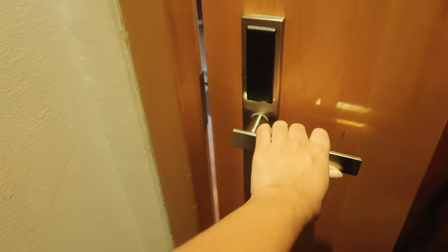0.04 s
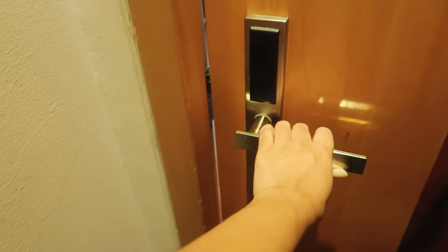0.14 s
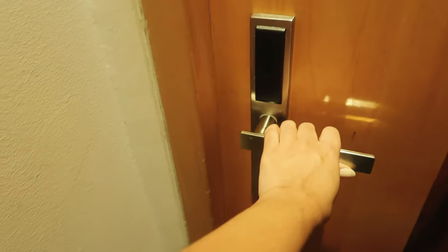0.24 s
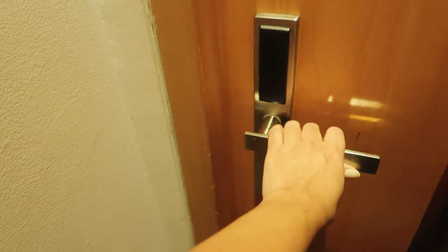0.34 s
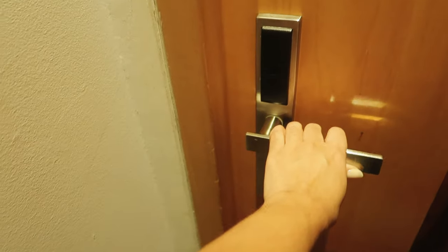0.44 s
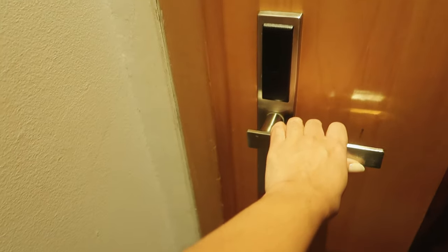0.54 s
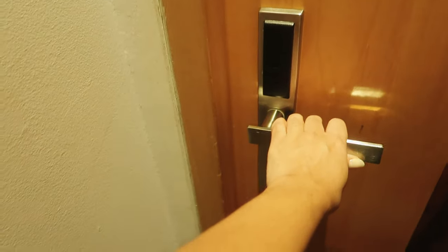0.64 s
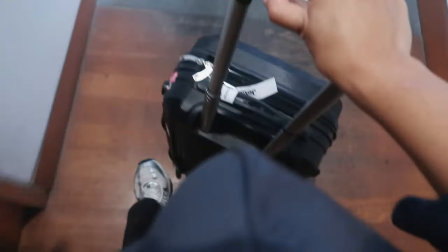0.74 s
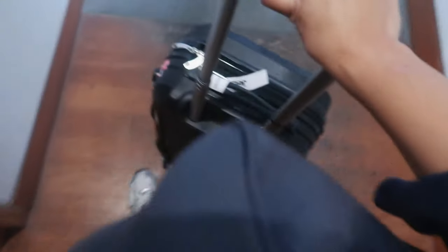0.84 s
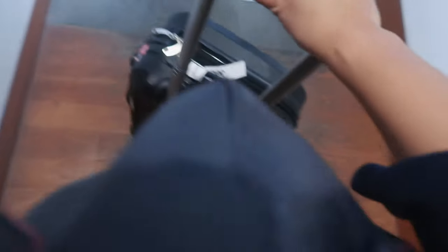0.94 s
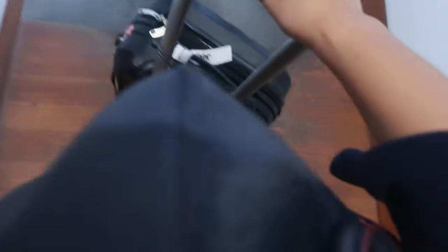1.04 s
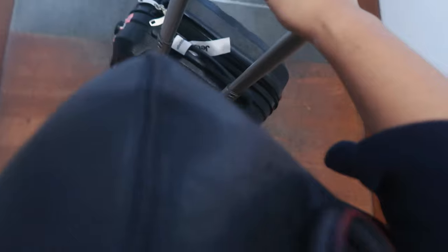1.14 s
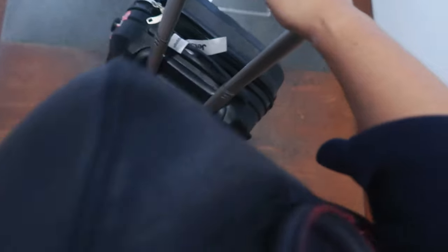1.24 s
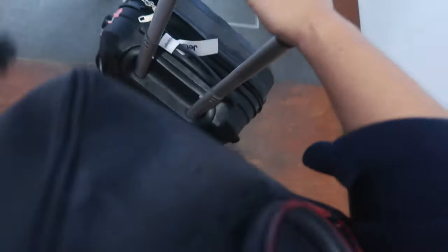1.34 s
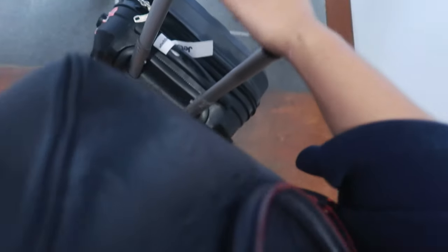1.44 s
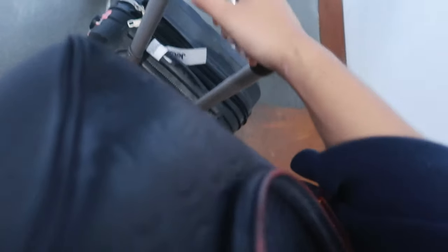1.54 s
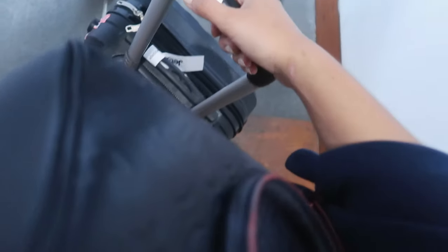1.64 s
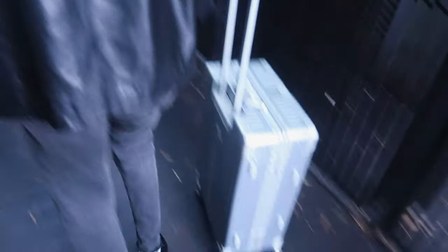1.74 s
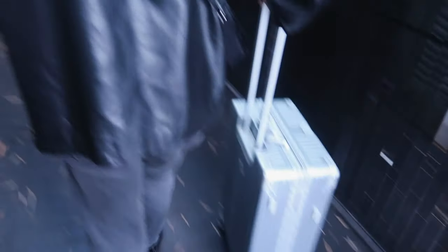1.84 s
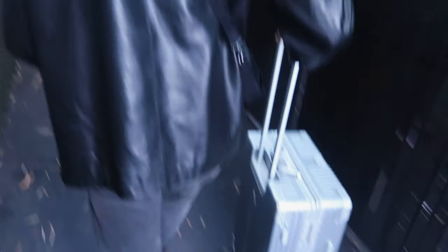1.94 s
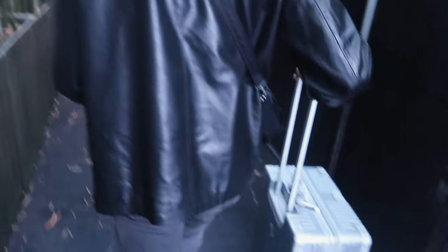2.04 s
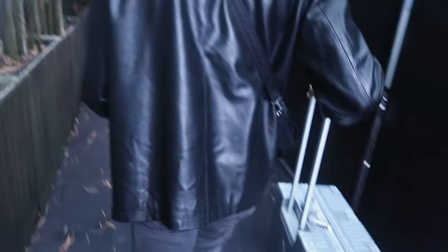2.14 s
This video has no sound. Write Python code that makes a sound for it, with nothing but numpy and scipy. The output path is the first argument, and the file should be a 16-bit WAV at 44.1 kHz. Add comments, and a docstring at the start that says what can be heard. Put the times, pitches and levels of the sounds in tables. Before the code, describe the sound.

A suitcase lands with a loud, short thump and plastic click, then rolls very faintly; before it a wooden door rattles and knocks shut in a corridor, after it another case bumps past. Close handheld microphone.

```python
"""Door latch and two rolling suitcases

Three scenes in a row. A wooden door is pulled shut in a corridor: latch ticks, knocks ringing the modes of the leaf,
rubbing noise, a deep shudder. A suitcase drops over a sill with a thump, then clicks and rolls on, the level
dropping after the thump; then another case rumbles by and bumps. Blows are struck modes, ticks are short noise
bursts, rolling is shaped uneven noise. The microphones limit the band; the loudest blows clip almost hard at full scale.
"""
import sys
import numpy as np
from scipy import signal
from scipy.fft import rfft, irfft, next_fast_len
from scipy.io import wavfile
from scipy.ndimage import uniform_filter1d, map_coordinates

SR = 44100
rng = np.random.default_rng(int(sys.argv[2]) if len(sys.argv) > 2 else 0)


def inscribe(sig):
    """Save sig as 16-bit PCM at rate SR to the path in sys.argv[1].

    A 1-D sig is mono; a 2-D sig holds one channel per row.
    Samples are clipped to [-1, 1] before scaling.
    """
    pcm = np.round(np.clip(np.atleast_2d(sig).T, -1, 1) * 32767)
    wavfile.write(sys.argv[1], SR, pcm.astype(np.int16))


def convert_level_to_amplitude(level_db):
    """Map a level in decibels to its linear amplitude factor."""
    exponent = np.asarray(level_db, float) / 20
    return 10 ** exponent


N = 97020

RISE_S = 0.0011  # build-up time constant of a blow

# deep bass of door and wheels: hz, relative_db
BASS = [(15, -38), (35, -2.5), (60, -9), (120, -4), (200, -30.5), (400, -78)]
# modes of the first suitcase shell: hz, relative_db, t60_s
CASE1_MODES = [(70, -9, .014), (115, -3, .024), (156, -1, .026), (255, -1.5, .022), (345, -2.5, .02),
               (470, -4, .022), (790, -12, .015), (1500, -16, .01)]


def unit_rms(x):
    """Scales to rms 1."""
    return x / np.sqrt(np.mean(x ** 2) + 1e-20)


def along(points, hz):
    """Interpolates (hz, value) points on a log frequency axis."""
    point_hz, value = np.transpose(points)
    return np.interp(np.log(hz + 1), np.log(point_hz + 1), value)


def curves(rows):
    """One per-sample curve for each column after the time in seconds."""
    s, *columns = np.transpose(rows)
    return [np.interp(np.arange(N) / SR, s, column) for column in columns]


def filtered(x, response):
    """Multiplies the spectrum of x by response(hz)."""
    n = x.shape[-1]
    size = next_fast_len(n + 8192)
    spectrum = rfft(x, size) * response(np.fft.rfftfreq(size, 1 / SR))
    return irfft(spectrum, size)[..., :n]


def high_pass(hz, low_hz):
    """Second-order response: little is radiated or picked up below low_hz."""
    return (1j * hz / (low_hz + 1j * hz)) ** 2


def add(track, start_s, sound):
    """Adds sound into track in place, cut at the end."""
    room = track[..., round(start_s * SR):][..., :sound.shape[-1]]
    room += sound[..., :room.shape[-1]]


def lumps(per_s, depth_db):
    """Gain of a rubbed or rolled surface: smooth random unevenness, per_s points a second."""
    points = rng.standard_normal(N // 50)
    return convert_level_to_amplitude(depth_db * map_coordinates(points, [np.arange(N) * per_s / SR]))


def rush(spectrum, grain=1):
    """Two shaped noises of joint rms 1, patchy in time and frequency."""
    patchy_db = 2
    z = signal.stft(rng.standard_normal((2, N)) * grain, nperseg=512)[2]
    field = uniform_filter1d(rng.standard_normal(z.shape[1:]), 4, 0)
    field = unit_rms(uniform_filter1d(field, 6, 1))
    pair = signal.istft(z * convert_level_to_amplitude(patchy_db * field), nperseg=512)[1][:, :N]
    return unit_rms(filtered(pair, lambda hz: convert_level_to_amplitude(along(spectrum, hz))))


def ring(modes, weight_db, count):
    """One blow on count scattered copies of each mode, peak 1, and a random-sign twin for the side."""
    vary_db, pitch_scatter = 2.5, 0.06
    t = np.arange(SR // 4) / SR
    hz, db, t60_s = np.repeat(modes, count, axis=0).T[:, :, None]
    draw = rng.standard_normal((len(hz), 3))
    decay = convert_level_to_amplitude(db + weight_db(hz) + vary_db * draw[:, :1] - 60 * t / t60_s)
    wave = decay * np.sin(2 * np.pi * hz * (1 + pitch_scatter * draw[:, 1:2]) * t)
    wave = wave * (1 - np.exp(-t / RISE_S))
    pair = np.array([wave.sum(0), (wave * np.sign(draw[:, 2:])).sum(0)])
    return pair / np.abs(pair[0]).max()


def ticks(rows, octaves):
    """Short dying noise bursts, band-passed around a pitch."""
    x, t = np.zeros((2, N)), np.arange(SR // 10) / SR
    for start_s, peak_db, pitch_hz, t60_s in rows:
        def band(hz):
            detune = (hz / pitch_hz - pitch_hz / (hz + 1)) / octaves
            return 1 / (1 + 1j * detune) ** 2 / (1 + 1j * hz / (2 * pitch_hz)) ** 4

        burst = filtered(rng.standard_normal((2, len(t))) * convert_level_to_amplitude(-60 * t / t60_s), band)
        add(x, start_s, convert_level_to_amplitude(peak_db) * burst / np.abs(burst[0]).max())
    return x


def bumps(rows, modes, low_hz):
    """Soft blows on a shell, each stirring mostly the modes near its pitch."""
    width_octaves = 0.67
    x = np.zeros((2, N))
    for start_s, peak_db, pitch_hz in rows:
        def near_db(hz):
            return -20 * np.log10(1 + (np.log2(hz / pitch_hz + 1e-6) / width_octaves) ** 2)

        def soften(hz):
            return high_pass(hz, low_hz) / (1 + 1j * hz / (3 * pitch_hz)) ** 2

        blow = filtered(ring(modes, near_db, count=2), soften)
        add(x, start_s, convert_level_to_amplitude(peak_db) * blow / np.abs(blow[0]).max())
    return x


def rolling(rows, rumble_spectrum, hiss_spectrum):
    """Wheels on an uneven floor: lumpy shell rumble, thin hiss with half the lumps' dB, deep bass."""
    rumble_db, hiss_db, bass_db = curves(rows)
    grain = lumps(per_s=120, depth_db=2.5)
    rumble = convert_level_to_amplitude(rumble_db) * rush(rumble_spectrum, grain)
    hiss = convert_level_to_amplitude(hiss_db) * rush(hiss_spectrum, np.sqrt(grain))
    bass = convert_level_to_amplitude(bass_db) * rush([(28, -40)] + list(BASS[2:]))
    return rumble + hiss + bass


def spread(pair, alike, lean, lead_s):
    """Mid and side noise become left and right with given likeness, level lean and left lead."""
    def mix(hz):
        turn = np.arccos(np.clip(along(alike, hz), -1, 1)) / 2
        return np.array([np.cos(turn), np.sin(turn)])

    mid, side = filtered(pair, mix)
    half = np.array([[.5], [-.5]])

    def offset(hz):
        return convert_level_to_amplitude(half * along(lean, hz)) * np.exp(2j * np.pi * half * hz * lead_s)

    return filtered(np.array([mid + side, mid - side]), offset)


def hush():
    """Steady quiet background noise behind the door."""
    # hz, relative_db
    hush_spectrum = [(15, -36), (25, -10), (212, -2), (450, -11), (1560, -21.5), (11000, -46), (16000, -71)]
    return convert_level_to_amplitude(-40) * rush(hush_spectrum)


def corridor(x):
    """Reverberation: a noise tail in which each frequency dies at its own speed."""
    # hz, t60_s
    decay_times = [(100, 0.23), (1000, 0.34), (5000, 0.24), (12000, 0.091)]
    hz, t, z = signal.stft(rng.standard_normal((2, SR // 2)), SR, nperseg=256)
    z = z * convert_level_to_amplitude(-60 * t / along(decay_times, hz)[:, None])
    tail = signal.istft(z, SR, nperseg=256)[1]
    delayed = np.pad(x, ((0, 0), (200, 0)))  # 200 samples
    return signal.fftconvolve(delayed, tail / np.linalg.norm(tail[0]), axes=1)[:, :N]


def second_case():
    """Another case rumbles by: rolling noise plus bumps ringing its shell."""
    # start_s, rumble_db, hiss_db, bass_db
    roll_levels = [(1.74, -29.5, -53, -46), (1.77, -27, -56.5, -53), (1.81, -20, -44.5, -62),
                   (1.85, -29, -54, -50), (1.91, -20.5, -50, -34), (1.932, -13.5, -32.5, -21.5),
                   (1.952, -19.5, -42, -49), (1.974, -33.5, -63, -47.5), (2.078, -36, -61.5, -54.5),
                   (2.13, -32, -62, -61), (2.186, -33, -61, -40.5), (2.2, -36, -54.5, -46.5)]
    # hz, relative_db
    rumble_spectrum = [(65, -46), (110, -14.5), (155, 3.5), (215, -6.5), (400, -4.5), (651, -19.5),
                       (1400, -32.5), (3080, -110)]
    # hz, relative_db
    hiss_spectrum = [(650, -33.5), (1100, -11.5), (5000, -13), (16000, -52.5)]
    # start_s, peak_db, most_excited_hz
    bump_rows = [(1.79, -25, 250), (1.803, -16.5, 393), (1.921, -21, 350), (1.929, -7.5, 104.6),
                 (1.9335, -4, 379), (1.937, -7, 216), (1.942, -13, 361), (1.948, -11.5, 252)]
    # shell modes: hz, relative_db, t60_s
    shell_modes = [(90, -3, .035), (150, -3.5, .04), (245, -1.5, .04), (345, -1, .04), (470, -4, .035),
                   (790, -16, .025), (1600, -24, .02), (2700, -26, .02)]
    # hz, left_right_likeness
    alike = [(60, 1), (240, 1), (950, 0.46), (3770, 1), (15000, 0.037)]
    # hz, left_minus_right_db
    lean = [(100, 0), (350, -0.5), (2380, 0)]
    x = rolling(roll_levels, rumble_spectrum, hiss_spectrum) + bumps(bump_rows, shell_modes, low_hz=40.3)
    return spread(x, alike, lean, lead_s=.0001)


def first_case():
    """A case rolls on, its level dropping after the thump: rolling noise, shell bumps, plastic clicks."""
    # start_s, rumble_db, hiss_db, bass_db
    roll_levels = [(.71, -37, -49, -37), (.76, -23, -31.5, -54), (.79, -52.5, -63, -47.5),
                   (.81, -43.5, -67.5, -60), (.854, -46, -68.5, -43.5), (.964, -47.5, -65.5, -58.5),
                   (1.05, -51, -65.5, -55), (1.18, -50, -66.5, -54.5), (1.2, -55, -70.5, -82),
                   (1.52, -56.5, -66, -64), (1.66, -57.5, -61.5, -80), (1.73, -55.5, -62, -76)]
    # hz, relative_db
    rumble_spectrum = [(76, -27), (130, -2.5), (393, -4.5), (529, -7), (570, -11), (733, -15.5),
                       (1200, -30.5), (1560, -38.5), (2640, -120)]
    # hz, relative_db
    hiss_spectrum = [(530, -42.5), (900, -10), (1160, -8.5), (1420, -11), (3590, -22.5), (16000, -49.5)]
    # start_s, peak_db, most_excited_hz
    bump_rows = [(.8628, -26, 383), (.8757, -17.5, 420), (1.387, -34, 446)]
    # plastic clicks: start_s, peak_db, pitch_hz, t60_s
    click_rows = [(.7575, -8, 1600, 0.0095), (.862, -25, 1200, 0.0097), (.8625, -32, 2270, .008),
                  (.8625, -45, 3960, 0.0095), (.8752, -30.5, 1400, 0.0093), (.8755, -37, 4000, 0.007),
                  (.887, -46.5, 1500, 0.043), (1.105, -52.5, 2200, .06), (1.3875, -42.5, 1410, 0.01)]
    # hz, left_right_likeness
    alike = [(60, 0.99), (240, 0.99), (950, 0.83), (3770, 0.081), (15000, 0.044)]
    # hz, left_minus_right_db
    lean = [(60, -0.091), (380, 0.74), (2380, -0.75)]
    x = rolling(roll_levels, rumble_spectrum, hiss_spectrum)
    x = x + bumps(bump_rows, CASE1_MODES, low_hz=40.3) + ticks(click_rows, octaves=.75)
    return spread(x, alike, lean, lead_s=.0001)


def sill_thump():
    """The first case lands off to the right: a cluster of blows on its shell."""
    # start_s, peak_db, most_excited_hz
    thump_rows = [(.7452, -1.5, 492), (.7485, -6, 473), (.7505, 0, 140), (.7535, 2, 400), (.7562, 9, 219),
                  (.7588, -1, 129)]
    # hz, left_right_likeness
    alike = [(180, 1), (400, .3), (2000, .1)]
    # hz, left_minus_right_db
    lean = [(180, 0.5), (380, -8.5), (3000, -9.5)]
    return spread(bumps(thump_rows, CASE1_MODES, low_hz=27.8), alike, lean, lead_s=.0001)


def door_shudder():
    """Deep shudder of the door: bass noise under a level curve."""
    # time_s, level_db
    sway_levels = [(0, -46.5), (.2, -53.5), (.3, -42), (.45, -40), (.52, -22.5), (.6, -34), (.68, -26),
                   (.71, -35.5)]
    (sway_db,) = curves(sway_levels)
    return convert_level_to_amplitude(sway_db) * rush(BASS)


def door_rub():
    """The leaf rubs in its frame: shaped noise, chattering as loose parts do while it moves."""
    # time_s, level_db
    rub_levels = [(.2, -33.5), (.26, -24.5), (.3, -27), (.39, -28.5), (.45, -27.5), (.58, -23),
                  (.66, -29.5), (.7, -30)]
    # hz, relative_db
    rub_spectrum = [(35, -34), (60, -12), (193, 8.5), (1280, -14.5), (1440, -8.5), (13000, -51.5),
                    (16000, -86.5)]
    (rub_db,) = curves([(.195, -91)] + list(rub_levels))
    return convert_level_to_amplitude(rub_db) * rush(rub_spectrum, lumps(per_s=290, depth_db=3))


def latch():
    """Latch and handle ticks, each with a ring of steel modes near its pitch, peaking 12 dB lower."""
    # start_s, peak_db, pitch_hz, t60_s
    tick_rows = [(.2025, -9.5, 5840, 0.017), (.2035, -12.5, 11700, 0.011), (.2045, -3.5, 4500, 0.0035),
                 (.251, -27.5, 5260, 0.16), (.298, -19.5, 6020, 0.084), (0.3083, -26.5, 10000, 0.018),
                 (.308, -22, 3200, .06), (.393, -27.5, 4080, 0.018), (.426, -30, 2400, 0.042),
                 (.4895, -25.5, 3670, 0.011), (.495, -19, 12400, 0.013), (0.4959, -5, 2600, 0.011),
                 (.5115, -17, 6616, 0.0057), (.519, -18, 10100, 0.034), (.549, -23.5, 4060, 0.043),
                 (.612, -21.5, 2800, 0.0061), (.684, -27, 5150, 0.0097)]
    # steel modes: hz, relative_db, t60_s
    steel_modes = [(2490, -3, .035), (3260, 0, .035), (4190, 0, .04), (5100, 1, .04), (6950, -2, .035),
                   (8300, -3, .03)]
    ring_db = -12  # relative to the tick
    x = ticks(tick_rows, octaves=0.74)
    for start_s, peak_db, pitch_hz, _ in tick_rows:
        steel = ring(steel_modes, lambda hz: -10 * np.abs(np.log2(hz / pitch_hz)), count=2)
        add(x, start_s, convert_level_to_amplitude(peak_db + ring_db) * steel)
    return x


def door_knocks():
    """Knocks of the leaf: crowded wood modes driven by a short rattling contact."""
    # start_s, peak_db, brightness_db_per_octave
    knock_rows = [(0.2031, -5.5, 5), (.208, -6.5, 3.5), (.252, -17.5, 6), (0.3072, -11, 5), (.313, -7.5, 0),
                  (0.4235, -12.5, -0.5), (0.44, -12.5, 0), (0.4953, 2.5, 2), (.499, -5.5, -0.5),
                  (0.518, -15.5, 2), (0.528, -17, -2), (.552, -19, -1.5), (.6115, -8.5, 0),
                  (0.6161, -8, -0.5)]
    # modes of the leaf: hz, relative_db, t60_s
    leaf_modes = [(118, -6, .15), (167, -4, .17), (300, -5, .11), (358, -1.5, .1), (441, -7, .1),
                  (500, -6, .09), (640, -6, .08), (760, -5, .07), (1000, -3, .055), (1200, -9, .045),
                  (1595, -9, .04), (2100, -12, .035), (2600, -13, .03), (3230, -18, .02)]
    chatter_t60_s, leaf_low_hz = .011, 94
    x, t = np.zeros((2, N)), np.arange(SR // 50) / SR
    contact = convert_level_to_amplitude(-60 * t / chatter_t60_s) * (1 - np.exp(-t / RISE_S))
    for start_s, peak_db, tilt_db in knock_rows:
        chatter = rng.standard_normal((1, len(t))) * contact
        leaf = ring(leaf_modes, lambda hz: tilt_db * np.log2(hz / 500), count=8)
        blow = signal.fftconvolve(leaf, chatter, axes=1)
        blow = filtered(blow, lambda hz: high_pass(hz, leaf_low_hz))
        add(x, start_s, convert_level_to_amplitude(peak_db) * blow / np.abs(blow[0]).max())
    return x


def door():
    """Latch and knocks answered by the corridor, over rubbing, shudder and hush."""
    # hz, left_right_likeness
    alike = [(60, .999), (300, 0.99), (1400, 0.94), (3100, 0.8), (7000, 0.38), (15000, .2)]
    # hz, left_minus_right_db
    lean = [(100, 0.12), (5000, 0.33)]
    corridor_db = -11.5
    blows = latch() + door_knocks()
    x = blows + convert_level_to_amplitude(corridor_db) * corridor(blows) + door_rub() + door_shudder() + hush()
    return spread(x, alike, lean, lead_s=0.000005)


def scene():
    """Door, first case, second case, joined by short linear fades."""
    cut1_s, cut2_s, gap_s = .7085, 1.7375, .004
    t = np.arange(N) / SR

    def after(start_s, fade_s=.0017):
        return np.clip((t - start_s) / fade_s, 0, 1)

    door_part = door() * (1 - after(cut1_s))
    first_part = (first_case() + sill_thump()) * (after(cut1_s) - after(cut2_s - gap_s))
    second_part = second_case() * after(cut2_s, fade_s=0.0079)
    return door_part + first_part + second_part


def band_limit(x):
    """A steep low-pass at the top of the band."""
    return signal.sosfilt(signal.butter(12, 16450, fs=SR, output="sos"), x)


def record(dry):
    """Band limits of the microphones, then almost hard clipping of the loudest blows at full scale."""
    low_hz, high_hz, knee = 28.6, 14600, 16
    x = filtered(dry, lambda hz: high_pass(hz, low_hz) / (1 + (hz / high_hz) ** 12))
    clipped = x / (1 + np.abs(x) ** knee) ** (1 / knee)
    return band_limit(clipped)


dry = scene()
out = record(dry)
inscribe(out)
```